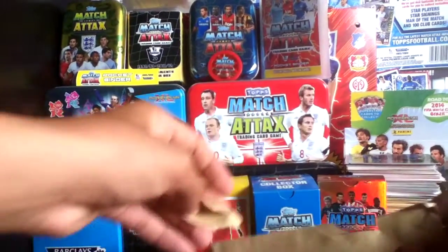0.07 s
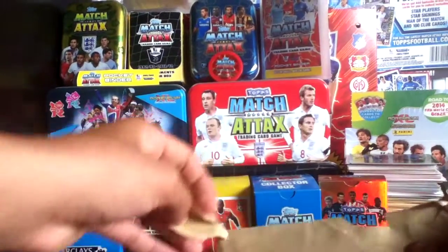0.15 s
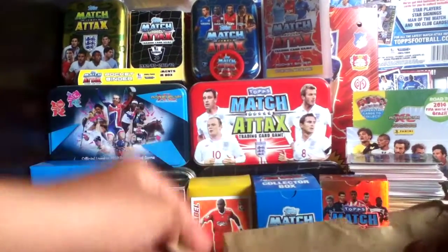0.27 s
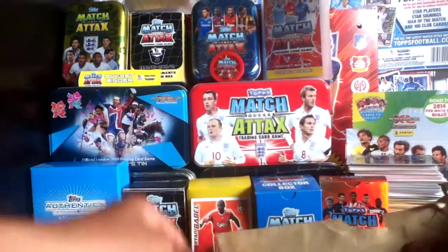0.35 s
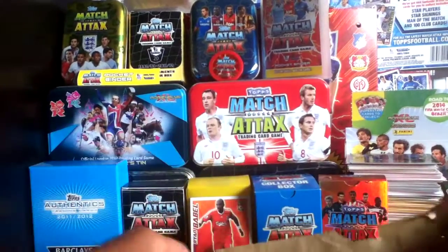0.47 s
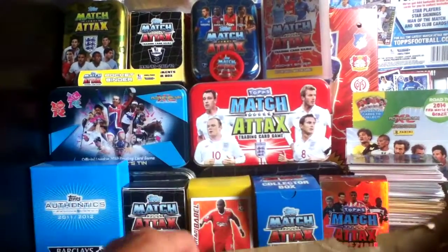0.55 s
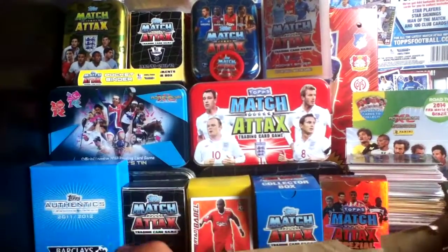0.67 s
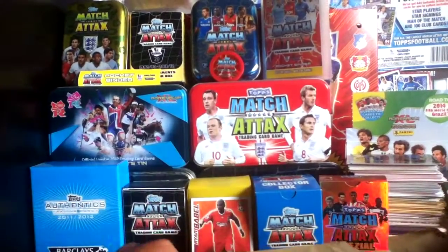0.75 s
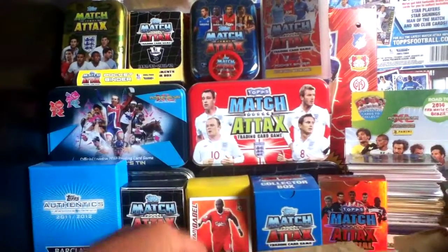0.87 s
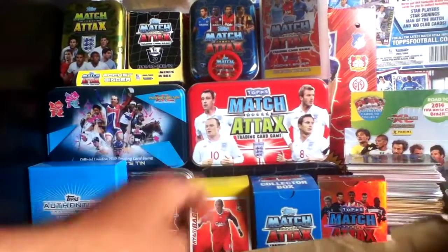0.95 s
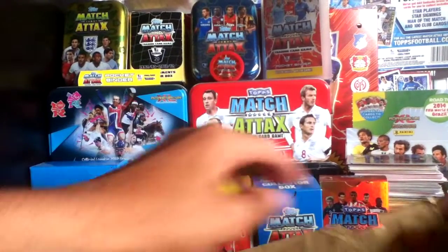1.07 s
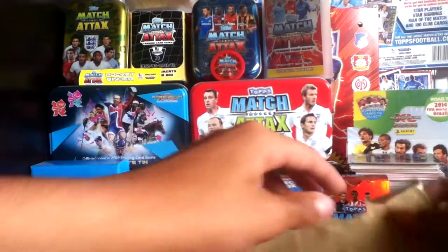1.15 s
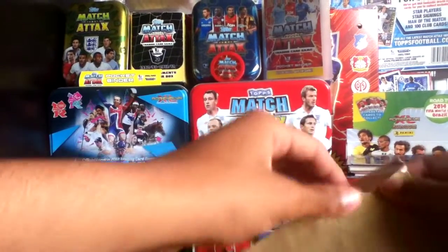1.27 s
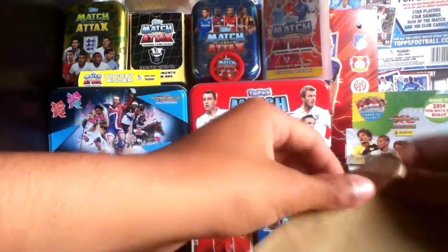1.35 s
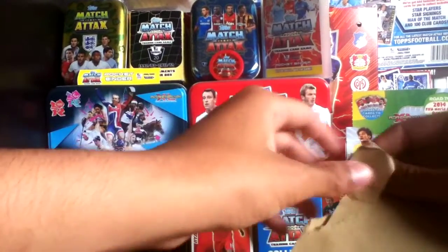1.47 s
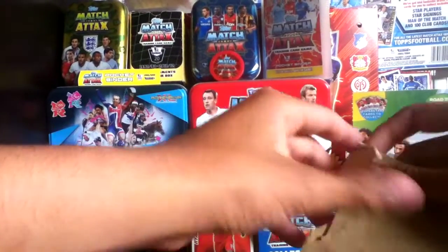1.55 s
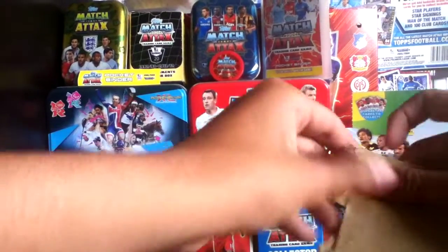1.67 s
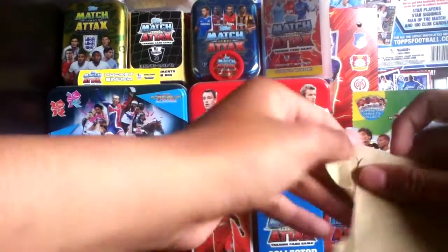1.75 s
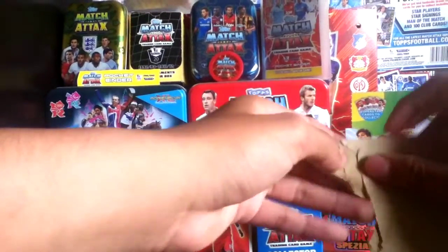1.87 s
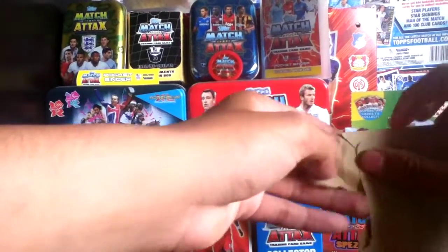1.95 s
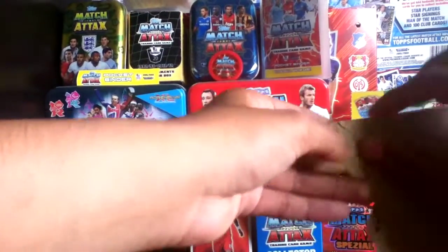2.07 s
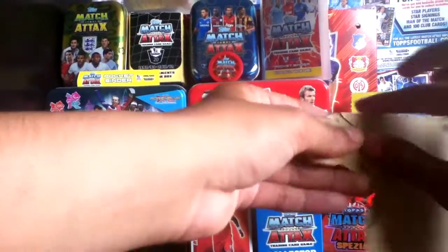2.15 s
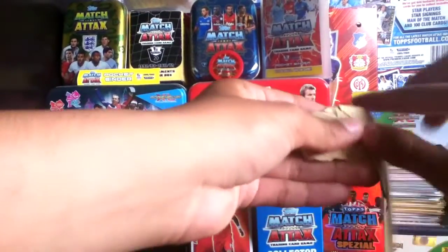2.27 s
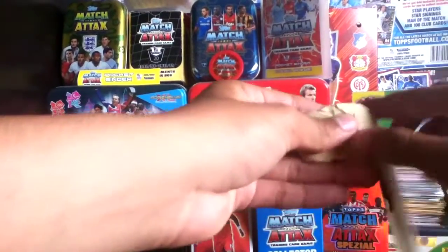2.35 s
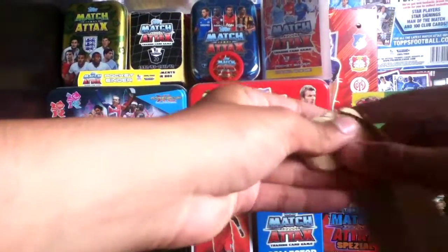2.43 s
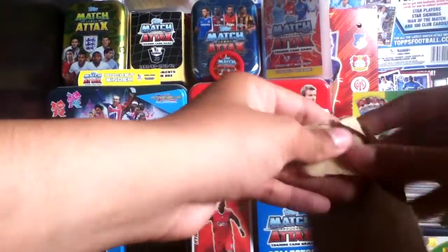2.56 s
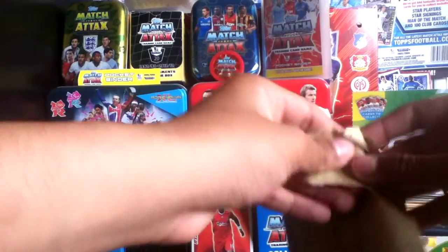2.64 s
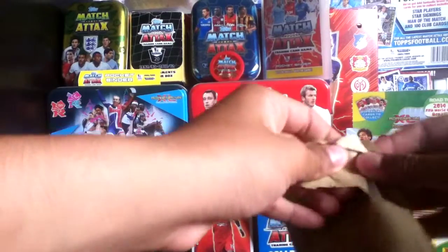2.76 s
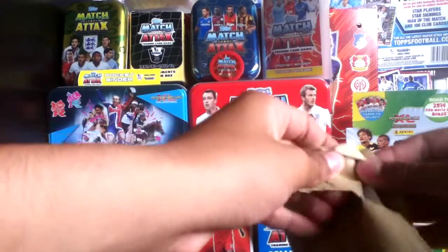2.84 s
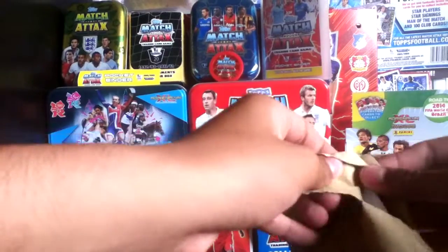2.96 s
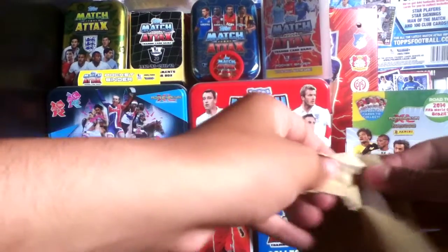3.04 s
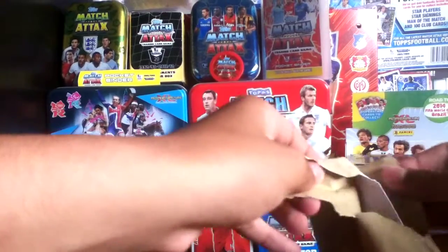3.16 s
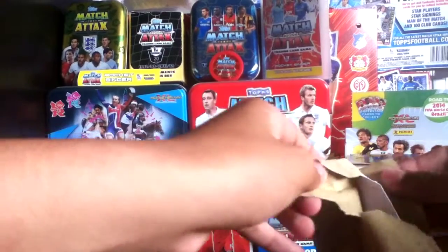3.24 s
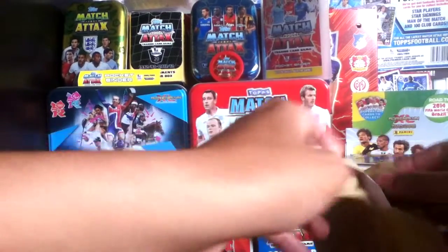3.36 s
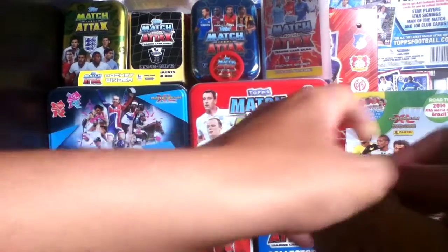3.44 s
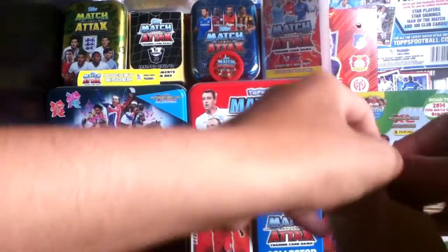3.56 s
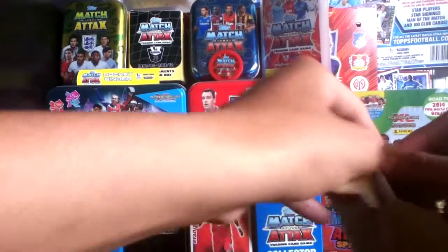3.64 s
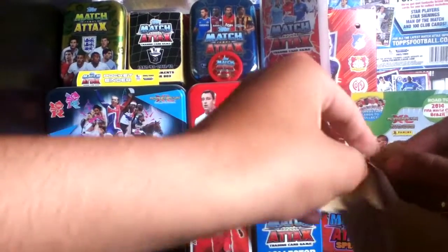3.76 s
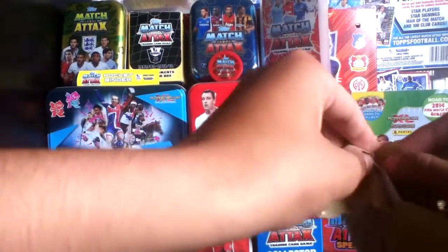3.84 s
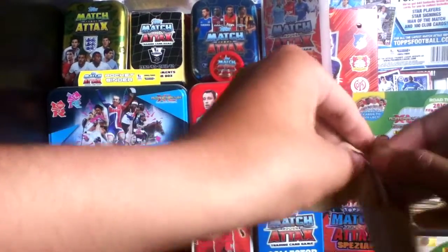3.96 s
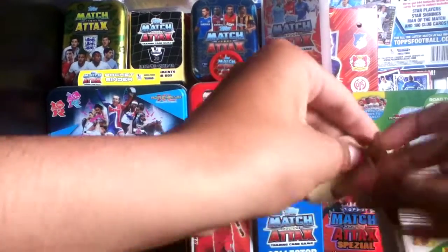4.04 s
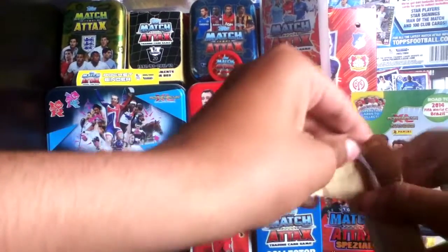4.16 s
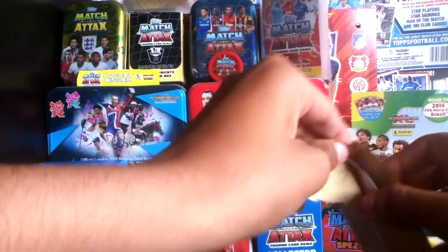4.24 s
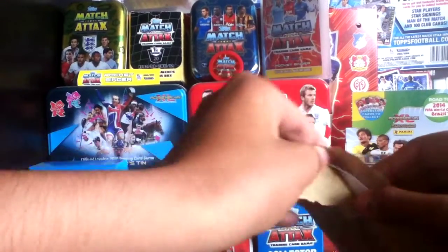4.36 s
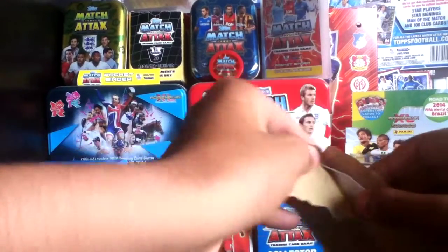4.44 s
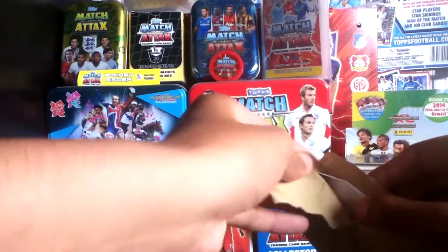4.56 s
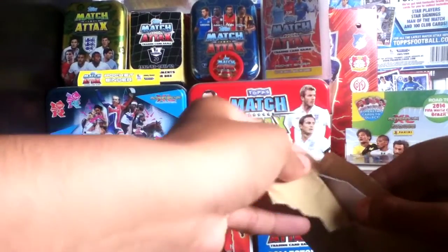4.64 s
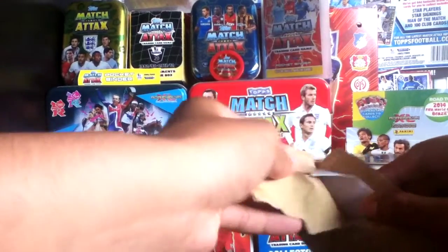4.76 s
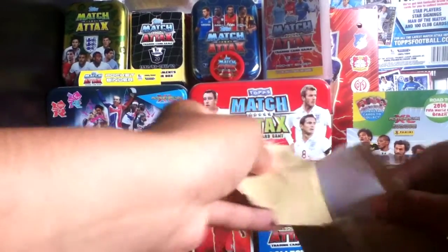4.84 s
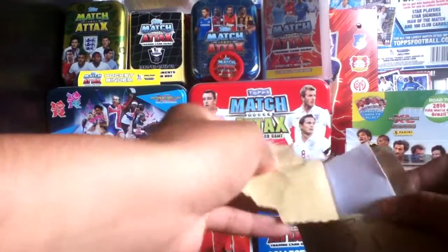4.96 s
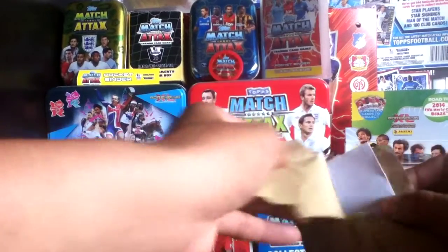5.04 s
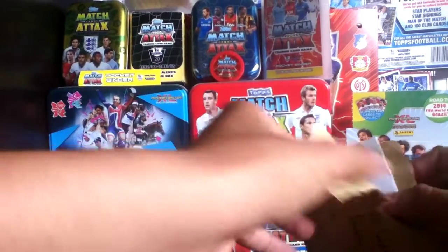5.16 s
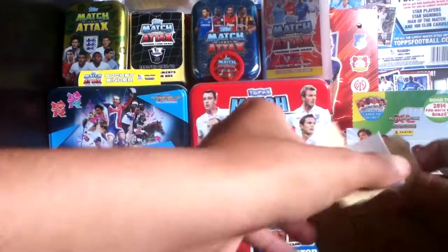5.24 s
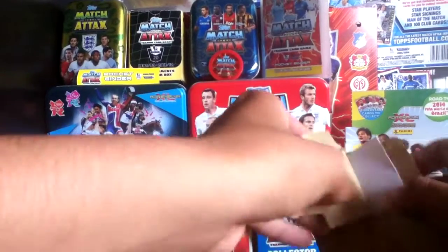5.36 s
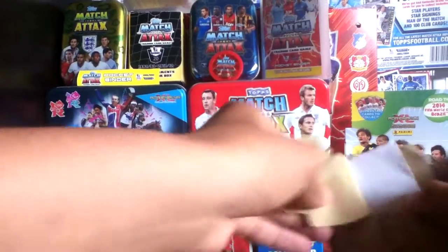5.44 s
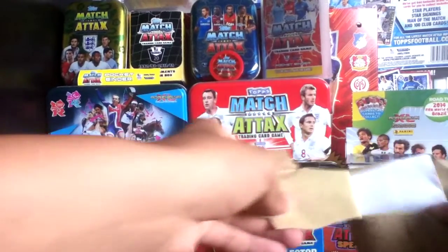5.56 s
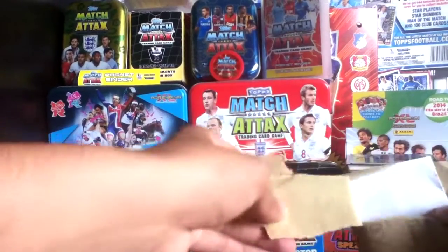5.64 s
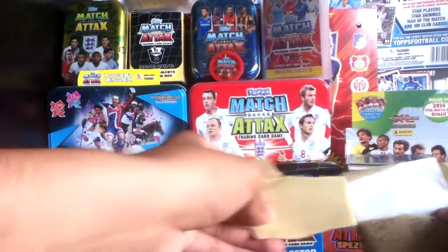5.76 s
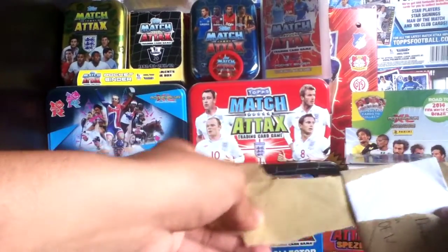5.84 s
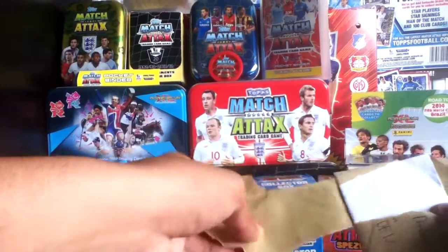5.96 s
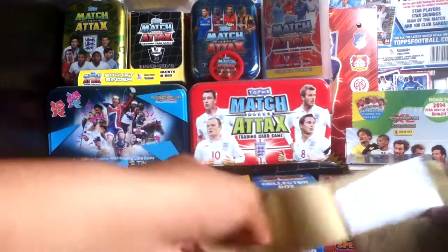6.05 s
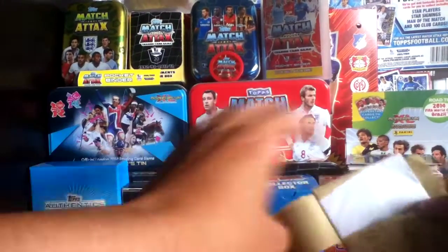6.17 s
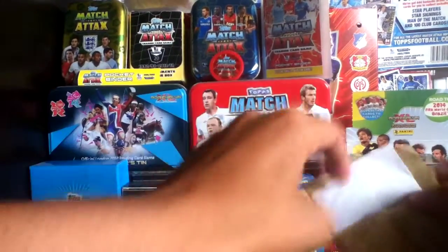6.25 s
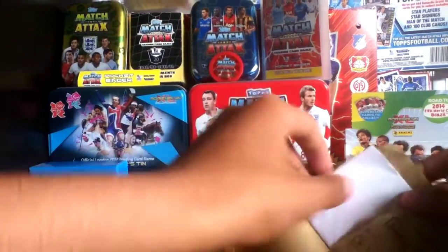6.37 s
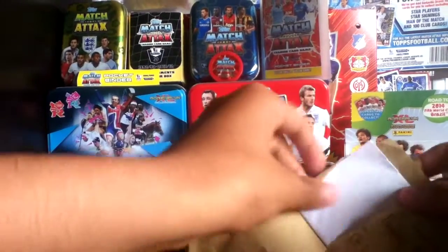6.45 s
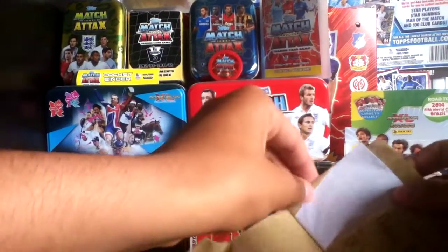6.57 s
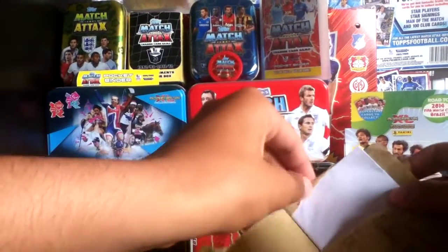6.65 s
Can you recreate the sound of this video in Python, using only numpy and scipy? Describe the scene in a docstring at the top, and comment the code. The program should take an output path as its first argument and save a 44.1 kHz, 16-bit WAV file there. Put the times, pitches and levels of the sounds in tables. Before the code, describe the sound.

A paper envelope is opened by hand close to the microphone. A short rip sounds right at the start. Until about 2.3 seconds there is only faint handling: fingers sliding over paper, small ticks and a few soft bumps. Sharper crinkles snap at about 2.3 and 2.6 seconds and continue lightly. A quick, loud tear comes at 3.2 seconds, followed by scattered crackles and finger scrapes, with a soft bump near 3.8. From about 4.6 seconds small picking tears lead into a longer rip that ends just after 5. After a brief lull, another long rip runs from 5.6 to 6 seconds in two pulls. A few soft crinkles and slides follow until about 6.7 seconds. The room is quiet, with very little echo and a faint, steady low rumble and hiss underneath.

```python
"""A short rip of brown paper, close to a small microphone: hands are opening an envelope over a table
of tins in a quiet room. Each rip is a run of breaking fibres that shake the sheet; more come after
three seconds, then picking and longer tears. In between, creases snap, fingers slide over the paper
and the hand bumps it softly. Table, tins and walls answer faintly, over a low room rumble and hiss."""
import sys
import numpy as np
from scipy import signal
from scipy.fft import rfft, irfft, next_fast_len
from scipy.io import wavfile
from scipy.ndimage import uniform_filter1d, minimum_filter1d, map_coordinates

SR = 44100
rng = np.random.default_rng(int(sys.argv[2]) if len(sys.argv) > 2 else 0)


def transcribe(signal):
    """Save signal, clipped to [-1, 1], as a 16-bit WAV file at the path in sys.argv[1]."""
    frames = np.atleast_2d(signal).T
    limited = np.clip(frames, -1, 1)
    pcm = np.round(limited * 32767).astype(np.int16)
    wavfile.write(sys.argv[1], SR, pcm)


N = 296043

# Levels in the tables are relative: each source has its own gain in the mix.
# Pulls of the hand, one table for each way of tearing: start/s, swell/s, hold/s, release/s, level/dB
FIRST_PULL = [(0.0, 0.02, 0.058, .012, -22)]
QUICK_PULLS = [(3.187, .004, .013, .005, -27.5), (3.204, .002, .027, 0.021, -11),
               (3.246, .024, .008, 0.063, -20.5)]
PICKING_PULLS = [(4.569, .002, 0.033, 0.02, -20), (4.611, 0.0045, 0.0033, .035, -25.5),
                 (4.693, 0.0013, 0.003, 0.034, -24.5), (4.722, 0.0053, 0.039, .012, -30),
                 (4.777, 0.007, .032, .01, -30.5)]
LONG_PULLS = [(4.82, 0.037, 0.11, .012, -23), (4.938, 0.023, 0.032, 0.072, -15.5),
              (5.609, 0.036, 0.024, 0.14, -15), (5.708, 0.011, 0.017, 0.064, -20),
              (5.85, 0.025, 0.01, 0.033, -27.5), (5.889, 0.031, 0.032, 0.037, -20.5)]
# Spectra of those four ways of tearing: f/Hz, level/dB
FIRST_SPECTRUM = [(59, -68), (100, -27), (467, -6), (627, -8), (956, -4), (1160, -8.5), (1490, -0.5),
                  (1960, -5.5), (3690, -1.5), (13900, -13.5), (15500, -20)]
QUICK_SPECTRUM = [(47, -59), (80, -11.5), (300, -3.5), (343, -10), (409, -7.5), (1050, -12.5), (1600, 4),
                  (3170, -2), (3460, 2), (5620, -6), (9130, -1), (15500, -15.5)]
PICKING_SPECTRUM = [(59, -57), (100, -3), (214, -49), (362, -13), (917, -22), (1090, -14), (2630, -5),
                    (4020, -7), (5750, -3), (9340, -8), (15500, -20)]
LONG_SPECTRUM = [(47, -68), (80, -42), (130, -15), (252, -19.5), (345, -11.5), (521, -11.5), (635, -14.5),
                 (809, -11.5), (1430, -12), (1710, -6), (2430, -1.5), (4130, -9), (7010, -8), (9130, -11),
                 (15500, -23)]
# Rumble and hiss of the room: f/Hz, level/dB
ROOM_TONE_SPECTRUM = [(15, -56), (25, -15.5), (133, -2), (169, -4), (198, -5), (289, -7), (359, -12),
                      (433, -11.5), (804, -18), (919, -18.5), (997, -15), (1080, -19.5), (2170, -22),
                      (9300, -26), (15500, -29.5)]
# How hard the hands work the held envelope: t/s, level/dB
GRIP_LEVELS = [(0.0, -71), (1.25, -63.5), (1.6, -51), (1.98, -52), (2.7, -43), (3.15, -51), (3.73, -47),
               (4.12, -50), (4.5, -42.5), (5.05, -52), (5.2, -59), (5.88, -48), (6.32, -60.5), (6.7, -49.5)]
# Rustle of the held paper: f/Hz, level/dB
RUSTLE_SPECTRUM = [(120, -7), (400, 7.5), (1100, 2.5), (3000, 0), (5000, -2), (8000, 0), (11000, -7),
                   (15500, -14)]
# Creases that buckle and fibres that give way: t/s, ring f/Hz, level/dB, fizz over crack/dB
CREASE_SNAPS = [(0.0094, 7000, -19, 14), (0.314, 7400, -50, -6), (0.3928, 2900, -46.5, 3),
                (0.852, 8600, -46, -2), (0.9125, 1400, -53.5, -22), (1.117, 3380, -55, -4),
                (1.218, 2900, -52.5, -14), (1.429, 1550, -44.5, -17), (1.659, 8270, -40, 8),
                (1.8344, 1700, -38.5, -4), (1.866, 5200, -39, 2), (1.9017, 1540, -46, 1),
                (2.149, 6840, -46, 5), (2.3443, 1643, -20, 5), (2.5644, 1650, -36.5, 2),
                (2.602, 1810, -14.5, 3), (2.631, 3350, -28, -15), (2.7404, 3070, -30, -15),
                (2.7645, 7300, -45, 19), (2.813, 7600, -43, 18), (2.8853, 3500, -29, -10),
                (2.9214, 2740, -31, -20), (2.9597, 5820, -34, 9), (3.0118, 2570, -24.5, -28),
                (3.0258, 2160, -29, -20), (3.1684, 7350, -45, 18), (3.1881, 7040, -24.5, 19),
                (3.2052, 2880, -19.5, 0), (3.243, 9000, -21.5, 24), (3.2668, 3500, -20.5, 4),
                (3.2859, 443, -20.5, -6), (3.3137, 7700, -31, 1), (3.4149, 8600, -41.5, 7),
                (3.4578, 3330, -39, 0), (3.55, 2880, -41.5, -7), (3.5975, 3360, -21.5, -11.5),
                (3.8168, 2270, -25.5, -5.5), (3.8483, 2290, -24.5, -6.5), (3.954, 3770, -31, 0),
                (4.0157, 8800, -48.5, 24), (4.2846, 2250, -33.5, -22), (4.355, 7160, -42, 6),
                (4.3784, 5860, -36, 2), (4.3866, 2650, -33, -19), (4.416, 2330, -36.5, -3.5),
                (4.475, 2920, -23.5, -5), (4.5703, 7600, -19.5, -0.5), (4.5977, 5760, -17.5, 22),
                (4.6162, 5550, -19.5, 12), (4.6743, 5530, -33, 4), (4.6952, 8950, -26.5, 3.5),
                (4.7261, 5600, -33.5, 5), (4.7873, 2820, -30.5, 1), (4.8032, 5640, -34, 16),
                (4.8165, 2600, -22.5, 4), (4.8827, 2520, -16, 0.5), (4.924, 4900, -18.5, -4),
                (4.9339, 2160, -17.5, -9), (4.9927, 3030, -16, -15), (5.0407, 2970, -25.5, 8),
                (5.0795, 9000, -29, 6), (5.097, 2910, -35, 2), (5.1971, 2240, -39, -10),
                (5.3854, 4720, -42.5, 2), (5.4343, 2590, -38, -4), (5.6045, 7670, -28, 3),
                (5.691, 2500, -18.5, -12), (5.8272, 2440, -37, 3), (5.842, 6100, -31.5, 5),
                (5.9479, 4100, -20, 4), (6.0326, 7250, -47.5, -1), (6.0932, 7040, -47, 2.5),
                (6.1377, 537, -29.5, -5.5), (6.2294, 805, -25, -2.5), (6.4162, 3900, -43, -2)]
# Fingers sliding on the paper: start/s, length/s, ring f/Hz, level/dB
FINGER_SLIDES = [(0.31, 0.061, 6600, -57), (0.405, 0.27, 1250, -58.5), (0.749, 0.044, 8200, -47.5),
                 (0.812, 0.047, 9150, -46), (1.374, .055, 3480, -54.5), (1.533, 0.022, 2480, -46),
                 (1.603, 0.035, 6800, -42), (1.656, 0.016, 8100, -36), (1.86, 0.04, 5100, -48.5),
                 (1.915, 0.046, 1710, -49), (1.986, 0.034, 7700, -53), (2.233, 0.03, 6950, -40),
                 (2.3, 0.025, 6930, -52), (2.347, 0.043, 3360, -49.5), (2.48, .08, 6860, -52),
                 (2.541, .055, 3170, -42.5), (2.66, 0.046, 6700, -42), (2.79, 0.085, 1560, -53.5),
                 (2.873, 0.078, 2830, -44), (3.411, 0.087, 3000, -52.5), (3.572, 0.079, 3200, -45),
                 (3.743, 0.075, 7650, -48.5), (3.801, 0.078, 2770, -49.5), (3.917, 0.052, 3760, -47.5),
                 (4.042, 0.055, 7260, -49.5), (4.201, 0.032, 3870, -42), (4.256, 0.091, 6240, -42),
                 (4.449, 0.1, 7800, -45), (5.247, 0.082, 4170, -55), (5.347, 0.077, 3300, -55),
                 (5.466, 0.087, 3850, -45.5), (5.98, 0.06, 3170, -57), (6.172, .087, 4200, -52.5),
                 (6.485, 0.06, 3580, -50), (6.62, 0.061, 7300, -50.5)]
# Low flexing, middle scrape and high hiss under a finger: f/Hz, level/dB
FLEX_SPECTRUM = [(120, -23), (220, 7.5), (430, 4.5), (900, 4), (1300, 9), (2500, -54.5)]
SCRAPE_SPECTRUM = [(600, -14), (1200, -3), (1700, 0.5), (3300, 4.5), (4400, 11), (7000, -29.5)]
HISS_SPECTRUM = [(2500, -11.5), (4600, 7.5), (6800, 3), (9000, 1.5), (11000, -7), (15500, -15)]
# Fingertips and hand bumping the envelope: t/s, f/Hz, level/dB
HAND_BUMPS = [(1.4174, 460, -38), (1.468, 827, -35.5), (1.95, 151, -27), (2.3394, 844, -37),
              (2.398, 206, -35.5), (2.402, 464, -34.5), (3.8487, 880, -23.5), (4.2625, 860, -33.5)]
# Broad peaks and dips colouring the paper sound near the table, with deep bass cut: f/Hz, gain/dB
NEAR_TABLE_COLOUR = [(30, -11), (100, -3.5), (200, 1), (350, 1.7), (480, 2.5), (640, -3), (860, 3.5),
                     (1150, -6), (1600, 0.5), (1950, -1), (2500, 2), (4000, 1)]
# Reverberation of the room: f/Hz, t60/s
ROOM_DECAY = [(150, 0.34), (2500, 0.18), (8000, 0.2), (15000, 0.15)]

CATCH_DB, RELEASE_DB = 10, 24.5  # a rip starts and ends this far under its full level
CREAK_S = .006  # a crease creaks this long before it snaps
BODY_FALL_DB_PER_OCT = 3.5  # above 1 kHz, the smaller the facet, the less it shakes the sheet
SNAP_PIVOT_DB, BODY_LAG = -33.5, 0.31  # harder snaps are thinner: the body loses this share of each dB
TICKS_PER_S, TICK_DB, TICK_SPREAD_DB, TICK_HZ = 7, -5, 0.5, 5000  # stray creases; level over the grip
SLIDE_PIVOT_HZ, FLEX_FALL_DB_PER_OCT, SCRAPE_TILT_DB_PER_OCT = 3000, 4.5, 0.53  # small patches are thin
CEILING, TOP_HZ = .93, 15950


def amp(db):
    """Decibels to gain."""
    return 10 ** (np.asarray(db) / 20)


def unit(x):
    """x at rms 1."""
    return x / np.sqrt(np.mean(x ** 2) + 1e-20)


def along(points, hz):
    """A curve of (f/Hz, value) points, read at hz on a log axis."""
    freqs, values = np.transpose(points)
    return np.interp(np.log(hz + 1), np.log(freqs + 1), values)


def clock(seconds):
    """Sample times over a duration."""
    return np.arange(int(seconds * SR)) / SR


def add(track, start, sound):
    """Mix a sound into the track at start seconds."""
    part = track[max(0, round(start * SR)):][:len(sound)]
    part += sound[:len(part)]


def coloured(x, spectrum):
    """x through a minimum-phase filter shaped by (f/Hz, level/dB) points."""
    size = 2 * next_fast_len(N // 2 + 8192)
    shape_db = np.maximum(along(spectrum, np.fft.rfftfreq(size, 1 / SR)), -100)
    cepstrum = irfft(np.log(amp(shape_db)), size)
    cepstrum[1:size // 2] *= 2  # folding onto positive time makes the filter causal
    cepstrum[size // 2 + 1:] = 0
    return irfft(rfft(x, size) * np.exp(rfft(cepstrum)), size)[:N]


def wobble(rate):
    """A smooth random curve, rate knots a second."""
    knots = rng.standard_normal(int(N * rate / SR) + 4)
    return map_coordinates(knots, [np.arange(N) * rate / SR])


def fibres(rate, spread_db, clump_db, ring_s, ring_db):
    """Paper fibres click in uneven clumps; each leaves a short diffuse ring in the sheet."""
    breaks = rng.random(N) < rate / SR
    size = amp(spread_db * np.minimum(rng.exponential(size=N), 3) + clump_db * wobble(170))
    clicks = breaks * size * rng.choice([-1, 1], N)
    ring_power = np.abs(signal.fftconvolve(clicks ** 2, amp(-120 * clock(.05) / ring_s))[:N])
    ring = unit(np.sqrt(ring_power) * rng.standard_normal(N))
    sound = unit(clicks) + amp(ring_db) * ring
    # held level over 20 ms, so that the hand sets the energy released
    local_power = np.abs(uniform_filter1d(sound ** 2, int(.02 * SR)))
    return sound / np.sqrt(local_power + 1e-6)


def hand_pull(pulls, edge_s):
    """The gain of the hand's pull: each rip catches, swells, holds and runs out."""
    t, gain = np.arange(N) / SR, np.zeros(N)
    for start, swell, hold, release, db in pulls:
        corners = start + np.cumsum([0, swell, hold, release])
        inside = (t >= start) & (t <= corners[-1])
        drop_db = np.interp(t, corners, [CATCH_DB, 0, 0, RELEASE_DB])
        gain = np.maximum(gain, inside * amp(db - drop_db))
    return uniform_filter1d(gain, int(edge_s * SR))


def rip(pulls, spectrum, rate, spread_db, clump_db, level_db):
    """A harder pull is louder and breaks more fibres: about rate a second at a pull of -20 dB."""
    pull = hand_pull(pulls, edge_s=0.006)
    breaks_per_s = rate * (.1 + pull / amp(-19.5))
    grain = fibres(breaks_per_s, spread_db, clump_db, ring_s=0.017, ring_db=-5.5)
    return amp(level_db) * pull * unit(coloured(grain, spectrum))


def tearing():
    """Close up, fast rips break fibres densely; slow picking lets single ones be heard."""
    first = rip(FIRST_PULL, FIRST_SPECTRUM, rate=5500, spread_db=1.5, clump_db=0.5, level_db=1.5)
    quick = rip(QUICK_PULLS, QUICK_SPECTRUM, rate=2800, spread_db=2.5, clump_db=0.5, level_db=-2.5)
    picked = rip(PICKING_PULLS, PICKING_SPECTRUM, rate=1800, spread_db=6.5, clump_db=2.5, level_db=-3.5)
    drawn = rip(LONG_PULLS, LONG_SPECTRUM, rate=1800, spread_db=3.0, clump_db=2.5, level_db=0.0)
    return first + quick + picked + drawn


def room_tone(level_db):
    """The quiet room at the microphone: steady low rumble and hiss."""
    return amp(level_db) * unit(coloured(rng.standard_normal(N), ROOM_TONE_SPECTRUM))


def grip_db(times):
    """The level of the handling at the given times."""
    return np.interp(times, *np.transpose(GRIP_LEVELS))


def grip_rustle(level_db, restless_db):
    """Faint uneven rustle while the hands keep hold of the envelope."""
    grain = fibres(rate=700, spread_db=1.5, clump_db=-1.0, ring_s=0.027, ring_db=-2)
    gain = amp(grip_db(np.arange(N) / SR) + level_db + restless_db * wobble(12))
    return gain * unit(coloured(grain, RUSTLE_SPECTRUM))


def snap(low_hz, high_hz, t60, spike, order):
    """A buckle in one band: a faint creak, a sharp spike, the sheet's flutter; rms 1 over the blow."""
    t = clock(.08) - CREAK_S
    age = np.maximum(t, 0)
    creak = amp(-21.5 + 8 * t / CREAK_S)
    buckle = amp(-60 * age / t60) + spike * amp(-60 * age / 0.0024)
    band = signal.butter(order, [low_hz, high_hz], "band", fs=SR, output="sos")
    sound = signal.sosfilt(band, np.where(t < 0, creak, buckle) * rng.standard_normal(len(t)))
    blow = sound[(t >= 0) & (t < .0065)]
    return sound / np.sqrt(np.mean(blow ** 2))


def stray_ticks(count):
    """Faint creases give at random, louder under a firm grip. Rows as in CREASE_SNAPS."""
    draws = rng.standard_normal((count, 4))
    times = np.cumsum((draws[:, 0] ** 2 + draws[:, 1] ** 2) / 2) / TICKS_PER_S  # exponential gaps
    octaves = np.clip(0.78 * draws[:, 2], -2, 1)
    levels = grip_db(times) + TICK_DB + TICK_SPREAD_DB * np.clip(draws[:, 3], -2, 2)
    brightness = 10 * octaves  # small facets fizz more
    return [row for row in zip(times, TICK_HZ * 2 ** octaves, levels, brightness) if row[0] < N / SR]


def creases(body_db, crack_db, fizz_db, ring_db, ring_s):
    """Each snap shakes the whole sheet and rings the small facet that buckled."""
    track, age = np.zeros(N), np.maximum(clock(.08) - CREAK_S, 0)
    for start, hz, db, bright in list(CREASE_SNAPS) + stray_ticks(count=70):
        body = db - BODY_FALL_DB_PER_OCT * max(0, np.log2(hz / 1000)) - BODY_LAG * (db - SNAP_PIVOT_DB)
        crack, fizz = db - max(bright, 0), db + min(bright, 0)
        sound = amp(body + body_db) * snap(255, 1570, t60=0.032, spike=0.4, order=2)
        sound += amp(crack + crack_db) * snap(1164, 4360, t60=0.028, spike=3.4, order=3)
        sound += amp(fizz + fizz_db) * snap(4740, 9370, t60=0.022, spike=3.7, order=2)
        by_pitch = [(850, body - 6), (1550, crack - 6), (2800, crack - 1), (4000, crack), (5500, fizz - 2)]
        facet_db = along(by_pitch, hz) + ring_db
        facet_t60 = ring_s * np.sqrt(3000 / hz)  # large, low facets ring longer
        sound += amp(facet_db - 60 * age / facet_t60) * np.sin(2 * np.pi * hz * age)
        add(track, start - CREAK_S, sound)
    return track


def finger_slides(flex_db, scrape_db, hiss_db, ring_db, ring_q, edge_s):
    """Skin catches on the grain of the paper, flexes the sheet and rings the patch under the finger."""
    grain = fibres(rate=1800, spread_db=2, clump_db=3.5, ring_s=0.018, ring_db=2.5)
    spectra = FLEX_SPECTRUM, SCRAPE_SPECTRUM, HISS_SPECTRUM
    bands = np.array([unit(coloured(grain, spectrum)) for spectrum in spectra])
    track, t = np.zeros(N), np.arange(N) / SR
    for start, length, hz, db in FINGER_SLIDES:
        end, octaves = start + length, np.log2(hz / SLIDE_PIVOT_HZ)
        flex = db - FLEX_FALL_DB_PER_OCT * octaves
        scrape, hiss = db + SCRAPE_TILT_DB_PER_OCT * octaves, db - SCRAPE_TILT_DB_PER_OCT * octaves
        moving = (t > start - edge_s) & (t < end + edge_s)
        inside_s = np.minimum(t[moving] - start, end - t[moving])
        speed = np.sin(np.pi / 2 * np.clip(inside_s / (2 * edge_s) + .5, 0, 1)) ** 2  # eases in and out
        patch = unit(signal.lfilter(*signal.iirpeak(hz, ring_q, SR), grain[moving]))
        patch_db = along([(4000, scrape), (5500, hiss)], hz) + ring_db
        gains = amp([flex + flex_db, scrape + scrape_db, hiss + hiss_db])
        track[moving] += speed * (gains @ bands[:, moving] + amp(patch_db) * patch)
    return track


def hand_bumps(t60, attack_s):
    """Soft pushes on the envelope, a few low cycles each; the times hold at 150 Hz and shorten above."""
    track, t = np.zeros(N), clock(.2)
    for start, hz, db in HAND_BUMPS:
        age = t * np.sqrt(hz / 150)
        attack = 1 - np.exp(-age / attack_s)
        add(track, start, 2 * amp(db - 60 * age / t60) * attack * np.sin(2 * np.pi * hz * t))
    return track


def table_echoes(x, echo_db, span_s, count):
    """x plus weak copies off the table and tins close by, whose delays shift as the hands move."""
    track, hop = np.zeros(N), SR // 8
    padded, fade = np.pad(x, (hop, 2 * hop)), signal.get_window("hann", 2 * hop)
    for start in range(0, N + hop, hop):
        response = np.zeros(int(span_s * SR) + 60)
        distance = (np.arange(count) + rng.random(count)) / count  # 0 nearest, 1 farthest
        delays = (50 + distance ** 2 * span_s * SR).astype(int)
        response[delays] = rng.choice([-1, 1], count) * amp(echo_db - 7.7 * distance)
        echoes = signal.fftconvolve(padded[start:start + 2 * hop] * fade, response)
        add(track, max(0, start - hop) / SR, echoes[max(0, hop - start):])
    return x + track


def wall_reverb(x):
    """The walls answer at the microphone 6 ms after the direct sound; treble dies first."""
    hz, t, noise = signal.stft(rng.standard_normal(SR // 2), SR, nperseg=256)
    decay = amp(-60 * t / along(ROOM_DECAY, hz)[:, None])
    tail = signal.istft(noise * decay, SR, nperseg=256)[1]
    tail = np.pad(tail, (int(.006 * SR), 0))
    return signal.fftconvolve(x, tail / np.linalg.norm(tail))[:N]


def scene():
    """One microphone close to the envelope: mostly direct paper, with the room well behind it."""
    snaps = creases(body_db=-4.0, crack_db=-1.5, fizz_db=-1.5, ring_db=7.5, ring_s=0.018)
    slides = finger_slides(flex_db=-3.5, scrape_db=-3, hiss_db=-2.0, ring_db=-3, ring_q=4.0, edge_s=0.015)
    paper = tearing() + snaps + slides + grip_rustle(level_db=-5.5, restless_db=3.5)
    paper = amp(-0.81) * coloured(paper, NEAR_TABLE_COLOUR)
    close = table_echoes(paper, echo_db=-14.5, span_s=.013, count=7)
    close += hand_bumps(t60=0.048, attack_s=0.0041)
    background = room_tone(level_db=-53.5)
    return (close + amp(-17.5) * wall_reverb(close) + background)[None]


def record(dry):
    """The recorder's limiter ducks the highest peaks; nothing is kept above its band limit."""
    span = int(.002 * SR)
    needed_gain = CEILING / np.maximum(np.abs(dry), CEILING)
    gain = uniform_filter1d(minimum_filter1d(needed_gain, span), span)
    size = next_fast_len(N + SR // 2)
    passband = np.fft.rfftfreq(size, 1 / SR) < TOP_HZ
    return irfft(rfft(dry * gain, size) * passband, size)[..., :N]


dry = scene()
out = record(dry)
transcribe(out)
```